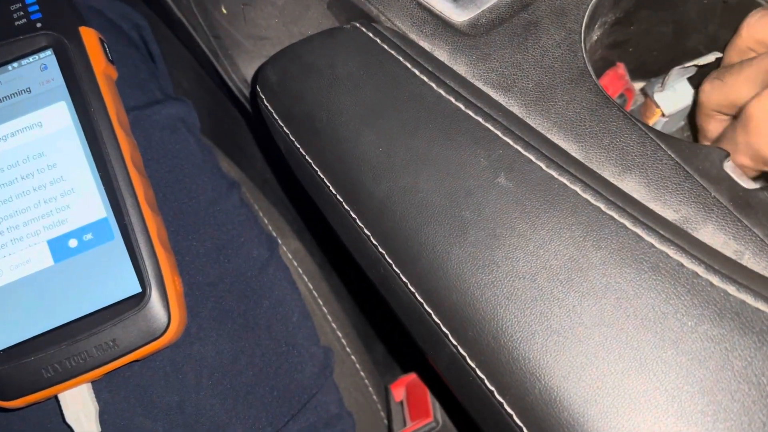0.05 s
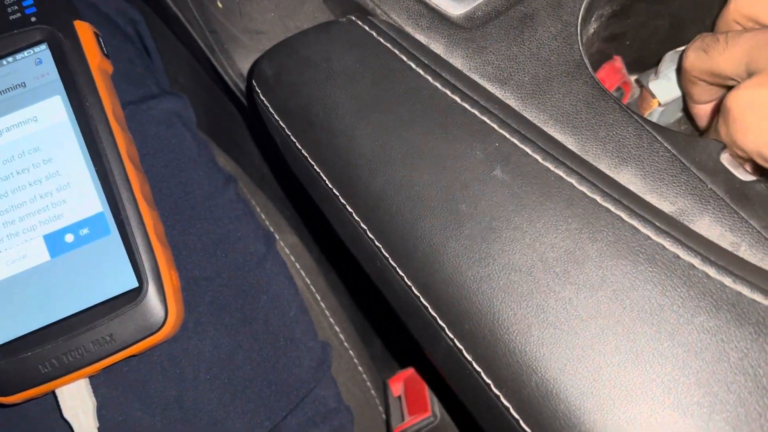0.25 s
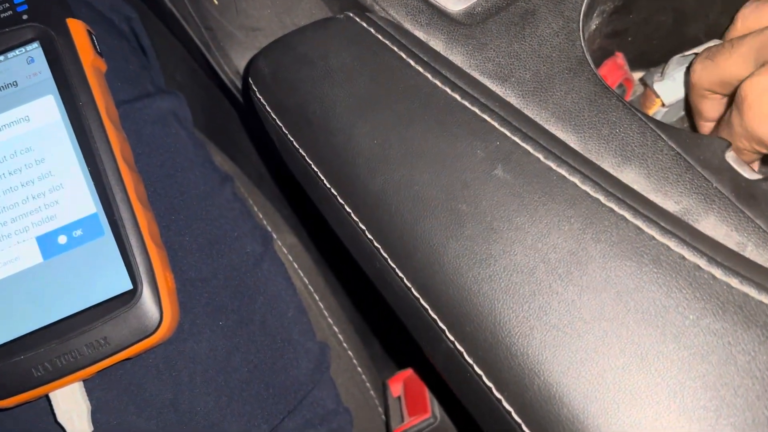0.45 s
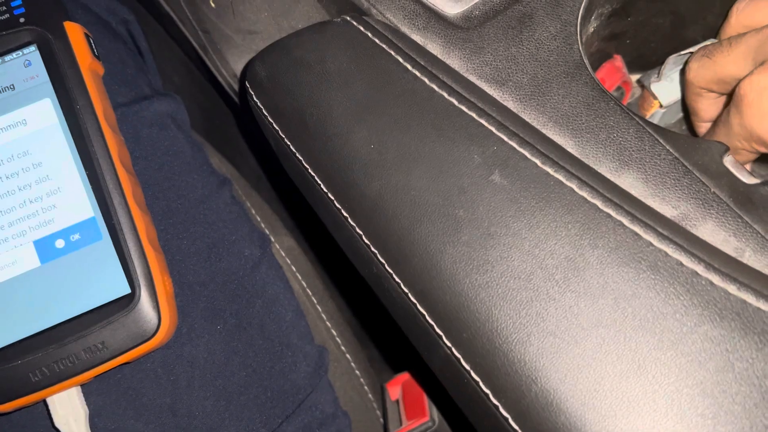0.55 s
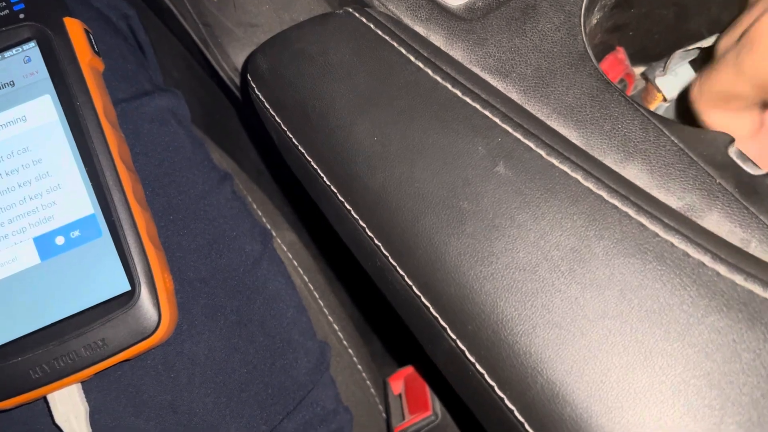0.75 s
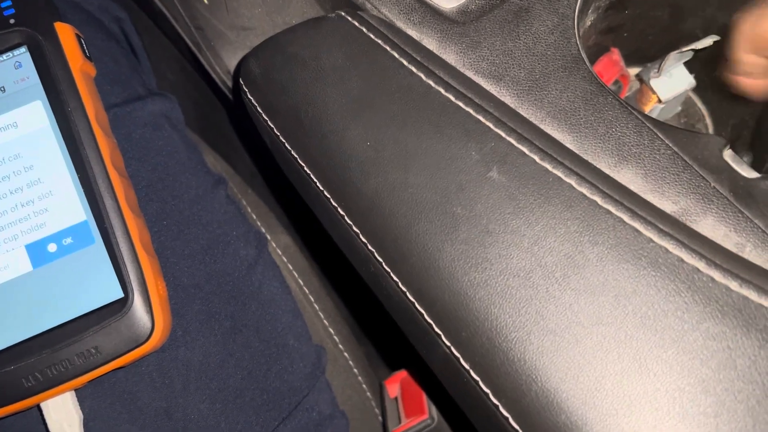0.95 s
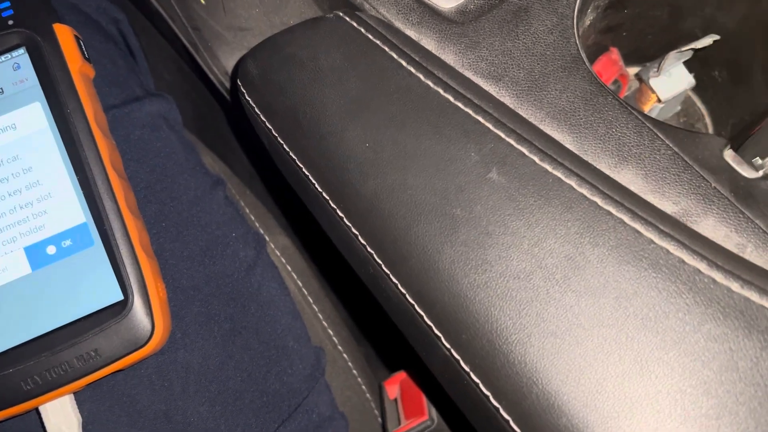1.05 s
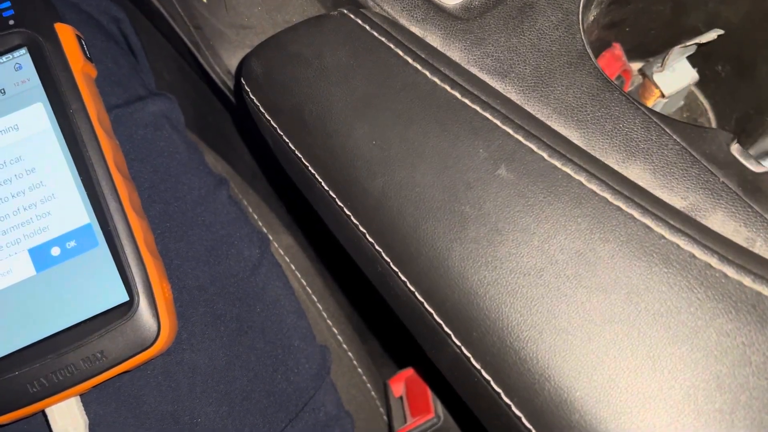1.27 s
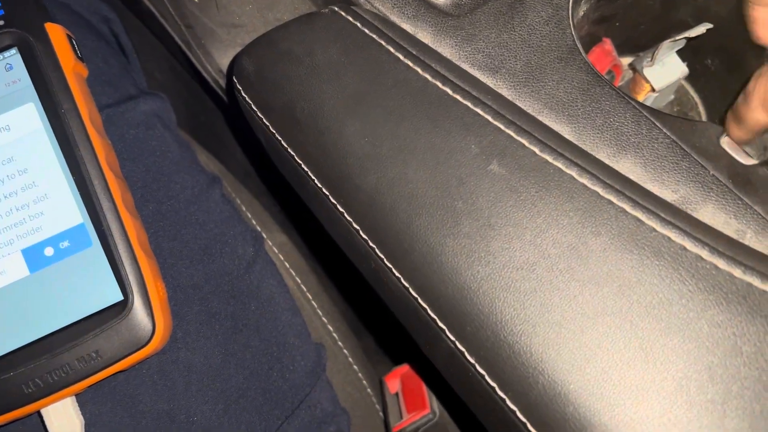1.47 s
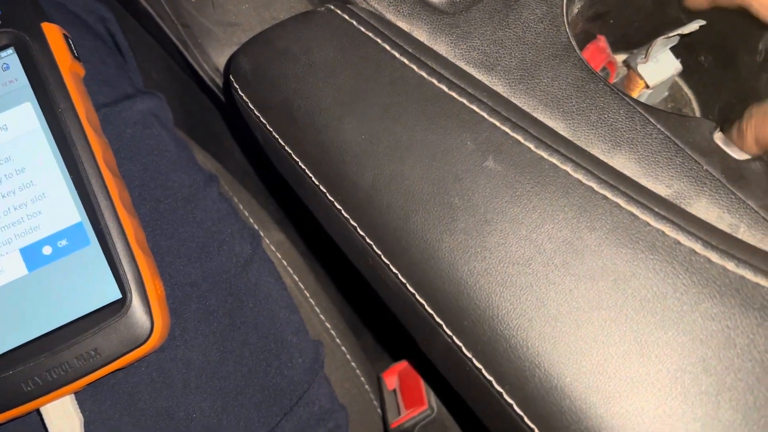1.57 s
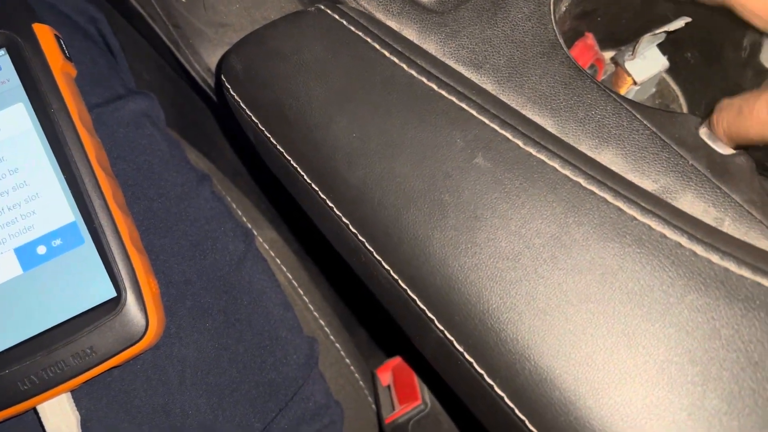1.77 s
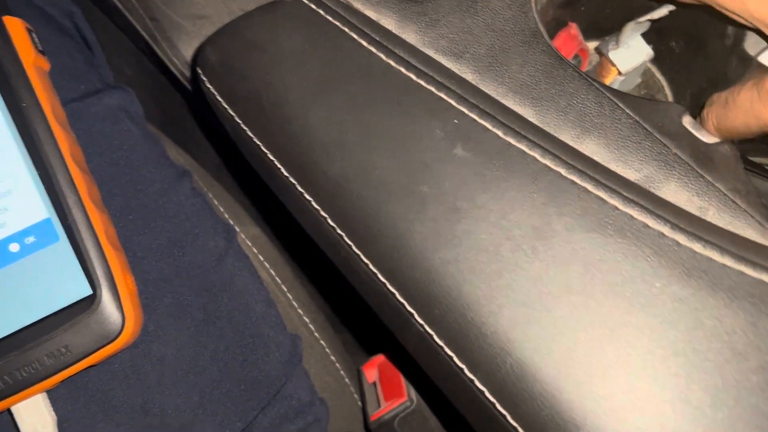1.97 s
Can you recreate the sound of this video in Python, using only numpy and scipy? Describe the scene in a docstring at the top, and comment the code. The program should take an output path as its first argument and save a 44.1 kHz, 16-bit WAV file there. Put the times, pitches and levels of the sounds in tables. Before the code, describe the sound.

A key fob knocks and clatters against a plastic slot in a quiet car, close to the microphone. Soft taps and rubbing come first, then harder knocks and a bright click as it seats, then a few lighter taps.

```python
"""Hollow plastic knocks, close by and a little to the right, inside a quiet car.
A hand is working a key fob into a slot in the centre console. Each contact snaps the fob's shell,
knocks the console and leaves a short thud in the cabin. Between knocks plastic slides on plastic;
the catch pings as the fob seats, and a last tap rings it. A faint low rumble lies under it all."""
import sys
import numpy as np
from scipy import signal
from scipy.fft import rfft, irfft, next_fast_len
from scipy.io import wavfile
from scipy.ndimage import uniform_filter1d

SR = 44100
rng = np.random.default_rng(int(sys.argv[2]) if len(sys.argv) > 2 else 0)


def file_out(sig):
    """Save sig as 16-bit WAV at sys.argv[1]."""
    # one column per channel
    cols = np.atleast_2d(sig).T
    # limit, then scale
    lim = np.clip(cols, -1, 1)
    pcm = np.round(lim * 32767).astype(np.int16)
    wavfile.write(sys.argv[1], SR, pcm)


N = 88817
RING = 11025  # samples allowed for a contact to die away
RIM, WALL, BASE = 342, 553, 610  # spots in the slot: spacing in Hz of the console modes each favours


def knocks():
    """The fob meets the walls of the slot, harder or softer in each register."""
    # Each row: start in seconds, levels in dB of thud, knock, clack, click and snap, spot struck.
    contacts = [ (0.032, -44, -41.5, -53.5, -75, -90, RIM), (0.172, -43.5, -48.5, -57, -58.5, -75, RIM),
                (.254, -46.5, -51, -72, -73, -79, BASE), (.341, -31.5, -33.5, -36, -45.5, -60, RIM),
                (.664, -45, -44.5, -49.5, -60, -70.5, BASE), (0.6867, -34, -27, -38, -45, -51, BASE),
                (.696, -43.5, -32, -40, -42.5, -47, WALL), (.7089, -18.5, -12.5, -15.5, -26.5, -33, WALL),
                (0.726, -28.5, -23, -24.5, -37, -46, WALL), (.7435, -33.5, -44.5, -41, -41, -48.5, BASE),
                (0.7509, -37, -44, -39.5, -47, -53, BASE), (0.7883, -25, -17.5, -21.5, -27, -37.5, RIM),
                (.841, -35.5, -36.5, -53, -54.5, -70, RIM), (0.8907, -28.5, -30, -40.5, -45, -53, RIM),
                (0.9335, -18.5, -13, -16, -33, -41, RIM), (1.0872, -26, -23, -32, -44.5, -54, RIM),
                (1.147, -35, -47, -43, -58.5, -67, RIM), (1.1918, -17, -12, -14, -29, -32.5, WALL),
                (1.211, -25, -18.5, -30, -46, -62.5, WALL), (1.2292, -14.5, -12, -19, -24, -33.5, WALL),
                (1.266, -28.5, -30, -43, -50.5, -65.5, BASE), (1.272, -31, -25, -42.5, -41.5, -60, BASE),
                (1.305, -28.5, -37.5, -39.5, -40, -53, BASE), (1.310, -27, -24.5, -32, -42, -55, WALL),
                (1.318, -32, -21, -31.5, -32, -39, BASE), (1.324, -24, -12, -15, -28.5, -32.5, BASE),
                (1.349, -33, -30, -44.5, -49.5, -64.5, WALL), (1.372, -29, -35.5, -44, -52, -60.5, WALL),
                (1.393, -20.5, -19, -35, -33.5, -42, WALL), (1.4268, -28, -30, -36.5, -39, -42, BASE),
                (1.447, -32.5, -29, -43.5, -58, -71, WALL), (1.618, -29.5, -40.5, -63, -58, -65.5, BASE),
                (1.643, -48.5, -45, -57, -68.5, -81, BASE), (1.668, -41, -47, -60, -68, -54, BASE),
                (1.738, -36.5, -36.5, -44, -53.5, -69, BASE), (1.7753, -43.5, -37, -49.5, -50, -46.5, WALL),
                (1.779, -22.5, -22.5, -49, -47, -60, WALL), (1.798, -28.5, -31, -41, -48.5, -53, WALL),
                (1.8124, -25, -27, -39, -51.5, -63, BASE), (1.8333, -26, -26.5, -47, -64.5, -74, WALL),
                (1.873, -28.5, -27.5, -35, -45, -67, WALL), (1.877, -22.5, -26.5, -33.5, -44.5, -56, RIM)]
    # Thud, knock, clack, click, snap. Each row: low and high edge in Hz, rise and t60 in seconds,
    # cabin tail's level in dB and t60 in seconds, dense modes' level in dB.
    registers = [(63, 440, 0.004486, .08, -19, 0.096, -2), (450, 2000, 0.001676, 0.021, -16.5, 0.069, -1),
                 (825, 1500, 0.002045, 0.036, -21, .072, -3.5), (1450, 5200, .0006, .011, -13, .05, 9),
                 (4730, 30000, .0004, 0.014, -14.5, .058, 5.5)]
    out = np.zeros((2, N))
    for start, *levels_db, spacing_hz in contacts:
        contact = sum(amp(db) * knock_register(row, spacing_hz) for db, row in zip(levels_db, registers))
        add(out, start, contact)
    return out


def knock_register(register, spacing_hz):
    """One register of a contact: any clear modes in its band, a burst of dense ones, a cabin tail."""
    # Modes of the console and cabin air. Each row: pitch in Hz, level in dB, t60 in seconds.
    console_modes = [(138.9, -20, .3), (228.7, 0, .11), (294, 1.5, .1), (398, 4, .045), (552, 10, .048),
                     (665, 5, .033), (711, -1, .045), (988, -2.5, .031), (1150, -7, .039), (1262, -9, .031)]
    # Modes of the fob's shell, in the same columns.
    shell_modes = [(2051, 3, 0.046), (2340, -7, 0.023), (3050, 4.5, 0.042), (3760, 8, 0.0055)]
    # Colour of the modes too dense to tell apart. Each row: frequency in Hz, level in dB.
    dense_colour = [(60, -12), (240, 1.5), (450, 6.5), (720, 18.5), (1000, 0), (1250, -7.5), (1480, -12.5),
                    (2200, -8), (3900, -8.5), (4800, -19.5), (6200, -12.5), (9400, -21.5), (10400, -34),
                    (15600, -30)]
    low_hz, high_hz, rise, t60, tail_db, tail_t60, dense_db = register
    scatter_db, detune = 3, 0.03  # the modes vary with the spot struck
    t = np.arange(RING) / SR
    clear = np.zeros((2, RING))
    modes = console_modes + shell_modes
    for (hz, db, mode_t60), (swell, bend) in zip(modes, rng.standard_normal((len(modes), 2))):
        if low_hz < hz < high_hz:
            wave = np.sin(2 * np.pi * hz * (1 + detune * bend) * (t - rise))
            decay = amp(db + scatter_db * swell - 60 * t / mode_t60)
            clear += spot_gain(hz, spacing_hz) * decay * wave
    f = np.fft.rfftfreq(RING, 1 / SR)
    in_band = (f > low_hz) & (f < high_hz)
    dense = noise(dense_colour, RING, lambda hz: spot_gain(hz, spacing_hz) * grip_gain(hz) * in_band)
    dense *= np.hypot(amp(-60 * t / t60), amp(tail_db - 60 * t / tail_t60))
    attack = 1 - np.exp(-(t / rise) ** 2)
    return unit_blow(unit_blow(clear * attack) + amp(dense_db) * unit_blow(dense * attack))


def spot_gain(hz, spacing_hz, depth_db=10):
    """The spot struck favours evenly spaced modes in the console's middle range."""
    middle = (hz > 450) & (hz < 1500)
    return amp(depth_db * np.cos(2 * np.pi * hz / spacing_hz) * middle)


def grip_gain(hz, spread_db=3, width_hz=450):
    """The shifting grip damps the shell anew at each contact: random peaks and dips in the treble."""
    steps = np.arange(0, SR / 2, width_hz)
    bumps = np.interp(hz, steps, rng.standard_normal(len(steps)))
    return amp(spread_db * bumps * (hz > 1500))


def catch_and_tap():
    """The catch pings as the fob seats, and the fob rings as it is tapped home."""
    # Modes of the catch and of the tapped fob. Each row: pitch in Hz, level in dB, t60 in seconds.
    catch_modes = [(3560, -1.5, .023), (3790, 7, 0.019), (6150, -6.5, 0.024)]
    tap_modes = [(2309, -3, .03), (2611, 0, .04)]
    return ping(catch_modes, start=1.2294, db=-19.5) + ping(tap_modes, start=1.8775, db=-40.5)


def ping(modes, start, db):
    """A small plastic part rings, bright and brief."""
    t = np.maximum(np.arange(N)[None] / SR - start, 0)
    ring = sum(amp(mode_db - 60 * t / t60) * np.sin(2 * np.pi * hz * t) for hz, mode_db, t60 in modes)
    return amp(db) * unit_blow(ring)


def console_sags(hz=64, rise_s=0.018):
    """After a hard push the whole console sags and springs back in a few deep swings."""
    # Each row: start in seconds, level in dB.
    pushes = [(0.952, -35), (1.241, -31.5)]
    out = np.zeros((2, N))
    t = np.arange(RING)[None] / SR
    swing = t / rise_s * np.exp(1 - t / rise_s) * np.sin(2 * np.pi * hz * t)
    for start, db in pushes:
        add(out, start, amp(db) * swing)
    return out


def slides(grain_db=1.5):
    """Fob and fingers rub the plastic: grainy hiss, and a hollow scuff from the console."""
    # Each row: start and length in seconds, hiss and scuff levels in dB.
    strokes = [(0.09, 0.046, -61, -53.5), (0.13, 0.097, -62.5, -56.5), (0.275, 0.096, -58, -53),
               (0.409, 0.062, -62, -60), (0.498, 0.048, -59, -72.5), (0.652, .07, -55.5, -35.5),
               (0.723, 0.07, -54, -44.5), (0.84, 0.028, -58, -45.5), (1.3, .11, -60, -34.5),
               (1.427, 0.065, -56, -39.5), (1.661, 0.023, -56.5, -48.5), (1.751, 0.038, -48.5, -39),
               (1.794, 0.13, -66, -39.5)]
    # Colours of the hiss and the scuff. Each row: frequency in Hz, level in dB.
    hiss_colour = [(1500, 1.5), (3000, -0.5), (4000, 7), (5000, -5), (6300, -0.5), (9400, -7.5),
                   (10500, -23), (16000, -15.5)]
    scuff_colour = [(110, -3.5), (220, 4.5), (750, 1.5), (1600, -19.5), (7000, -48.5)]
    grain = amp(grain_db * unit_rms(uniform_filter1d(rng.standard_normal(N), size=110)))
    hiss = unit_rms(noise(hiss_colour, N) * grain)
    scuff = unit_rms(noise(scuff_colour, N))
    t = np.arange(N) / SR
    out = np.zeros((2, N))
    for start, length, hiss_db, scuff_db in strokes:
        swell = np.sin(np.pi * np.clip((t - start) / length, 0, 1))
        out += swell * (amp(hiss_db) * hiss + amp(scuff_db) * scuff)
    return out


def cabin_rumble(db=-50):
    """Low rumble and faint hiss fill the car around the microphones."""
    # Each row: frequency in Hz, level in dB.
    cabin_colour = [(20, -18), (45, 8.5), (100, -5), (250, -16.5), (620, -25.5), (1200, -27.5),
                    (3600, -35.5), (7000, -43.5), (11000, -61), (16000, -72.5)]
    return amp(db) * unit_rms(noise(cabin_colour, N))


def at_microphones(sound, ripple_width_hz=428.4):
    """The slot sits a little right of the stereo pair; nearby surfaces scatter the phase."""
    # Each row: frequency in Hz, left minus right level in dB.
    balance = [(60, 3), (160, -2.5), (600, -1.76), (2500, -4.5), (10000, -0.6)]
    # Each row: frequency in Hz, phase lead of the left side in radians.
    lead = [(330, -.15), (560, -0.39), (800, -1.95), (1150, -1.01), (3000, -1.37)]
    # Each row: frequency in Hz, scatter of that lead in radians per unit of wander.
    ripple = [(1400, .058), (3500, 0.89)]
    size = next_fast_len(N + RING)
    hz = np.fft.rfftfreq(size, 1 / SR)
    wander = np.interp(hz / ripple_width_hz, np.arange(200), rng.uniform(-2, 2, 200))
    phase = curve(lead, hz) + curve(ripple, hz) * wander
    sides = np.array([[0.5], [-0.5]])
    response = amp(sides * curve(balance, hz)) * np.exp(1j * sides * phase)
    return irfft(rfft(sound, size) * response, size)[:, :N]


def noise(colour, size, gain=lambda hz: 1, alike=0.87):
    """Coloured noise, nearly alike at the two microphones."""
    left, spread = rfft(rng.standard_normal((2, size)))
    right = alike * left + np.sqrt(1 - alike ** 2) * spread
    hz = np.fft.rfftfreq(size, 1 / SR)
    return irfft(np.array([left, right]) * amp(curve(colour, hz)) * gain(hz), size)


def amp(db):
    """Decibels to gain."""
    return 10 ** (np.asarray(db) / 20)


def curve(points, hz):
    """A table's value on a log-frequency axis."""
    f, value = np.transpose(points)
    return np.interp(np.log(hz + 1), np.log(f + 1), value)


def add(mix, start, sound):
    """Lays a sound into the stereo mix at a start in seconds."""
    part = mix[:, max(round(start * SR), 0):][:, :sound.shape[1]]
    part += sound[:, :part.shape[1]]


def unit_rms(x):
    """Scales to an rms of 1."""
    return x / np.sqrt(np.mean(x ** 2) + 1e-20)


def unit_blow(x):
    """Scales to the energy of 10 ms at an rms of 1."""
    return x / np.sqrt(np.sum(x.mean(0) ** 2) / (0.01 * SR) + 1e-20)


def scene():
    """Fob and console close to the microphones, the cabin's rumble behind."""
    handling = knocks() + catch_and_tap() + console_sags() + slides()
    return at_microphones(handling) + cabin_rumble()


def record(dry):
    """The loudest knocks are softly rounded off and the top treble is cut."""
    rounded = dry / (1 + dry ** 6) ** (1 / 6)
    lowpass = signal.firwin(511, cutoff=16600, window=("kaiser", 9), fs=SR)
    return signal.oaconvolve(rounded, lowpass[None], "same")


dry = scene()
out = record(dry)
file_out(out)
```